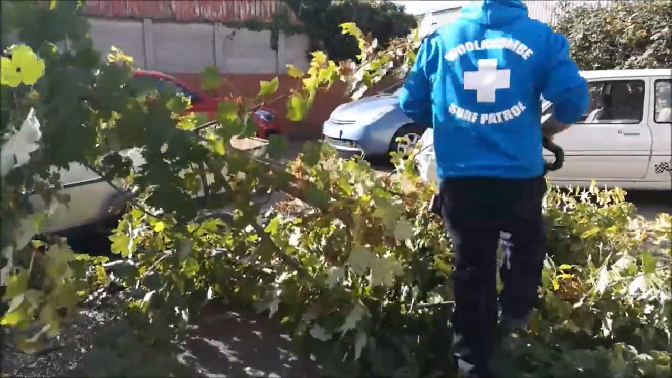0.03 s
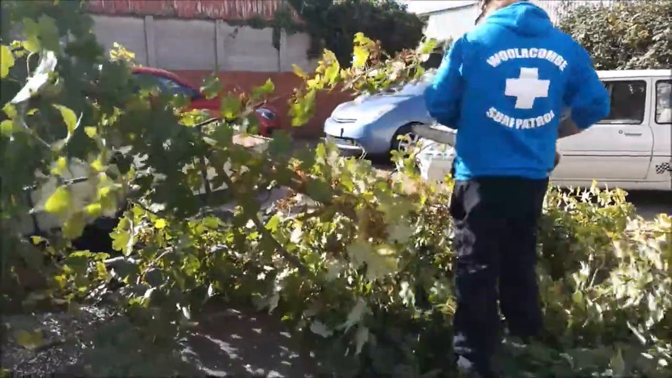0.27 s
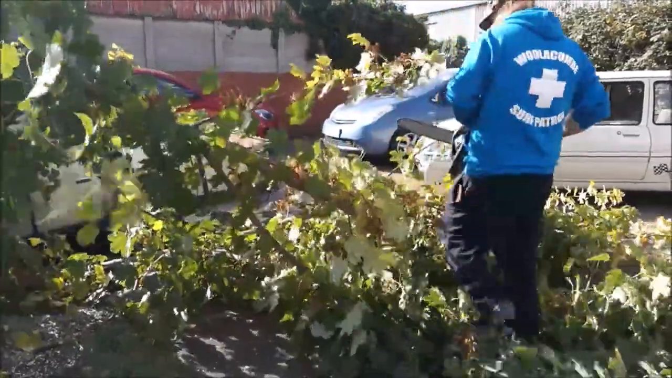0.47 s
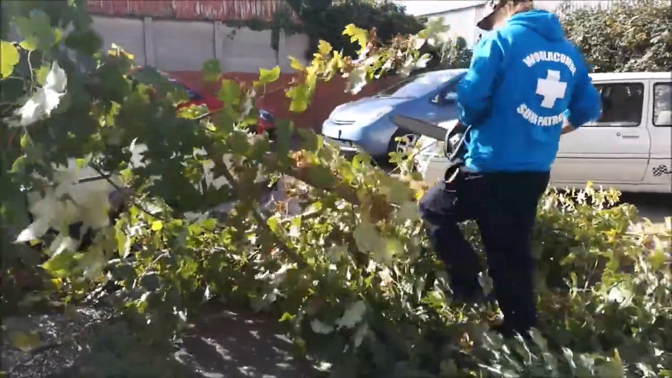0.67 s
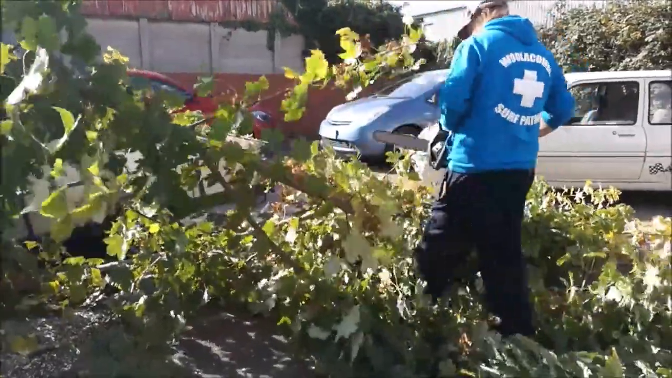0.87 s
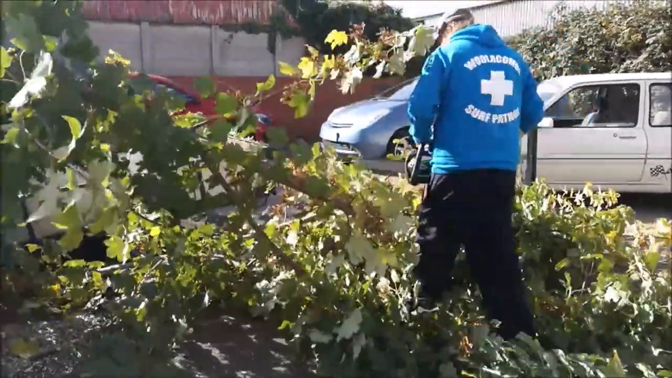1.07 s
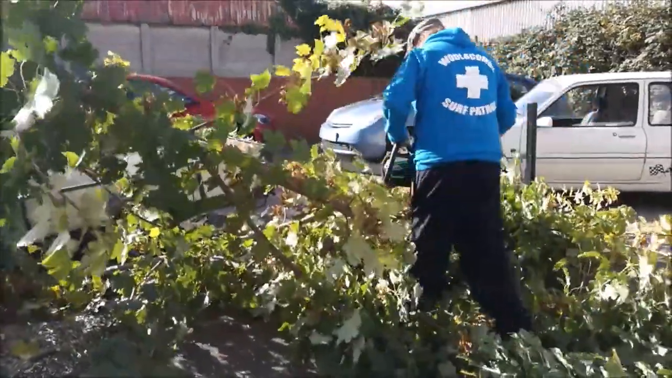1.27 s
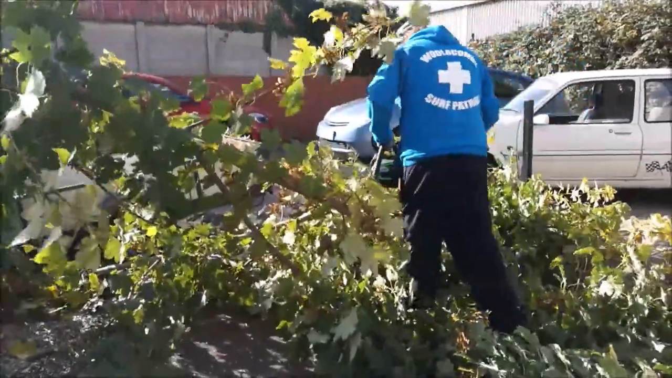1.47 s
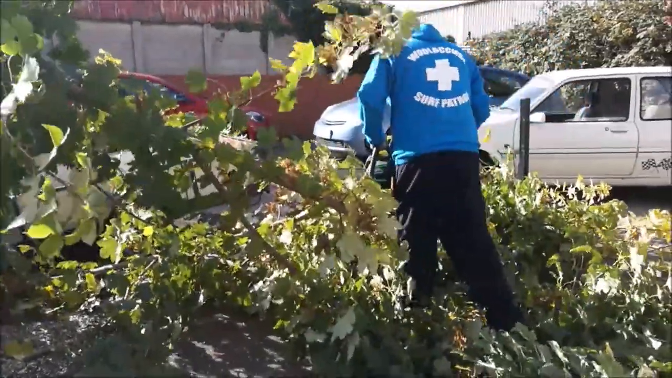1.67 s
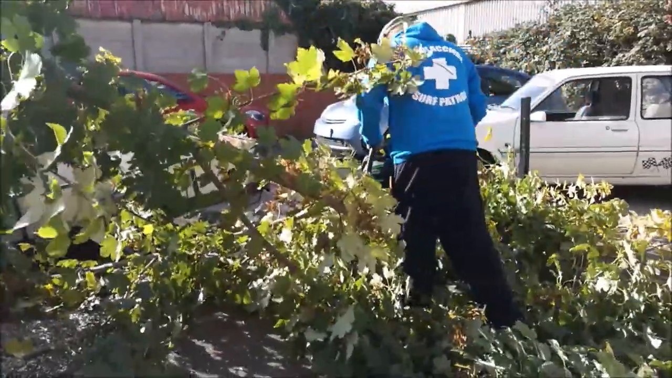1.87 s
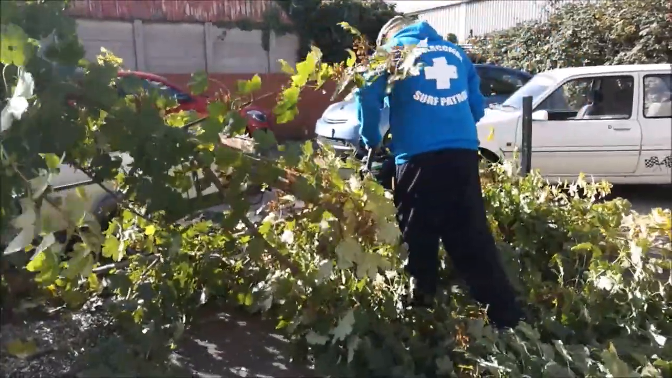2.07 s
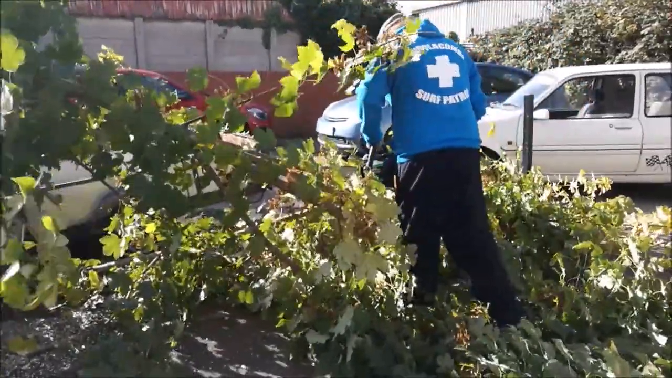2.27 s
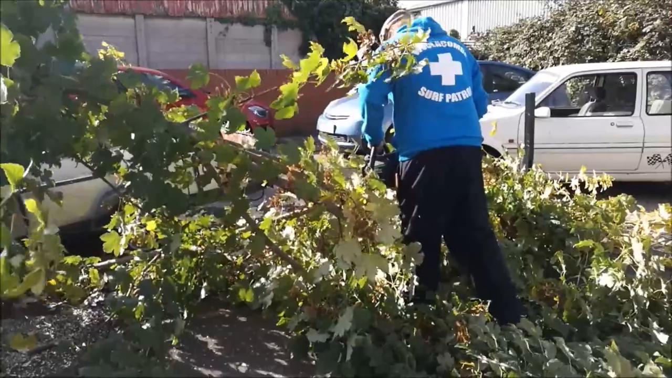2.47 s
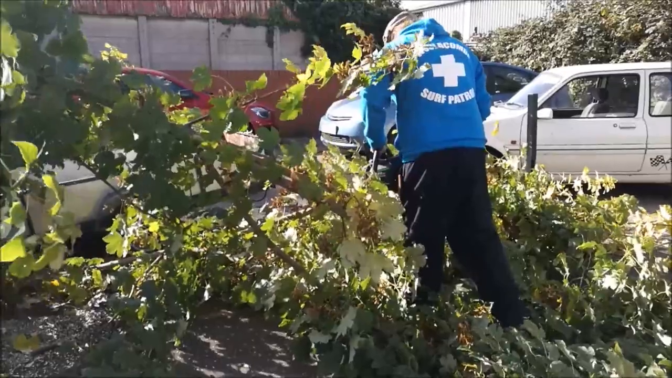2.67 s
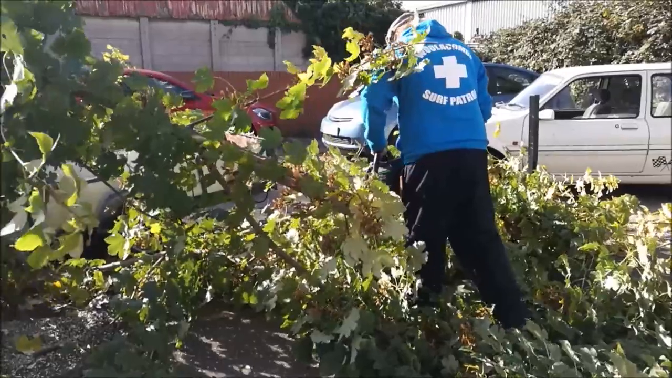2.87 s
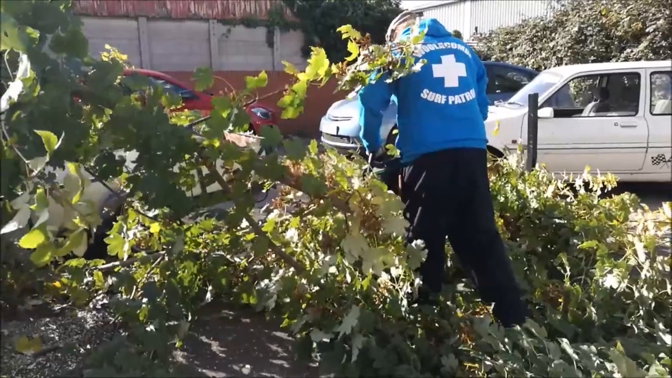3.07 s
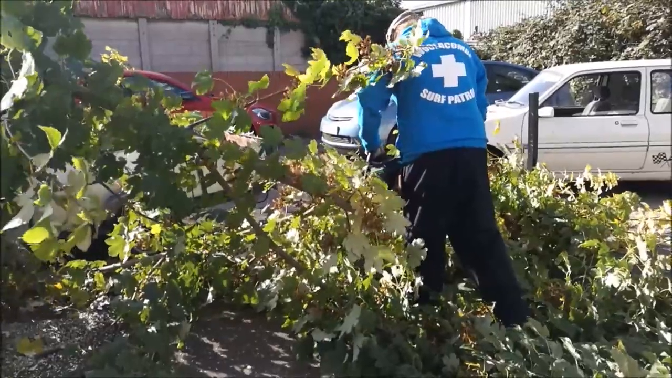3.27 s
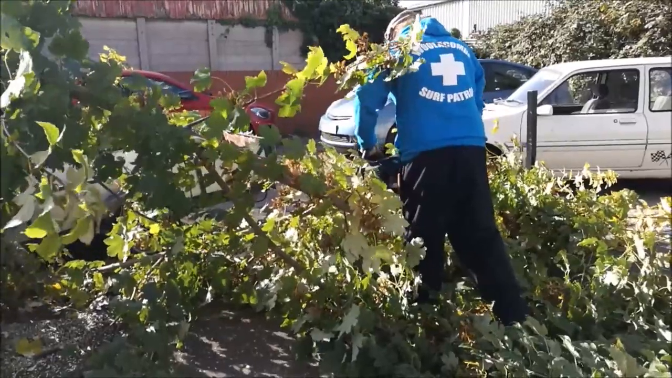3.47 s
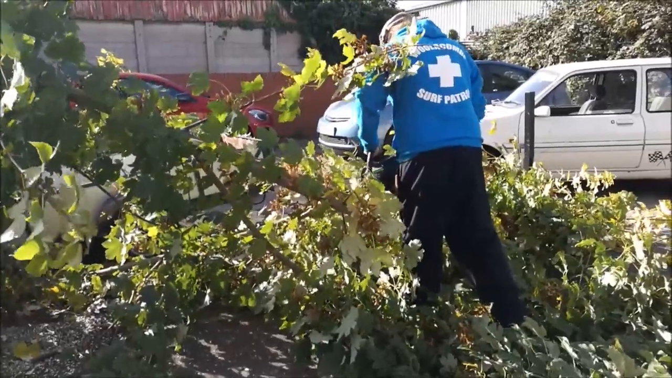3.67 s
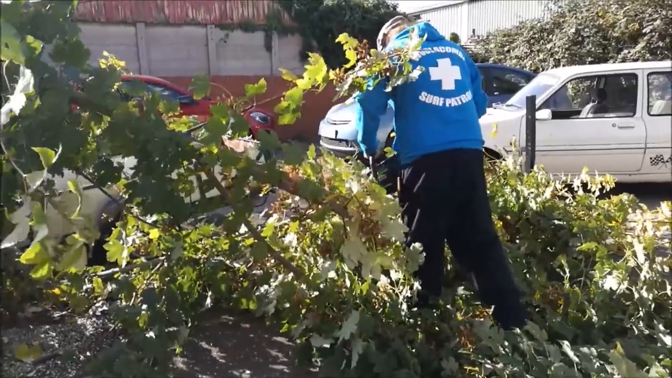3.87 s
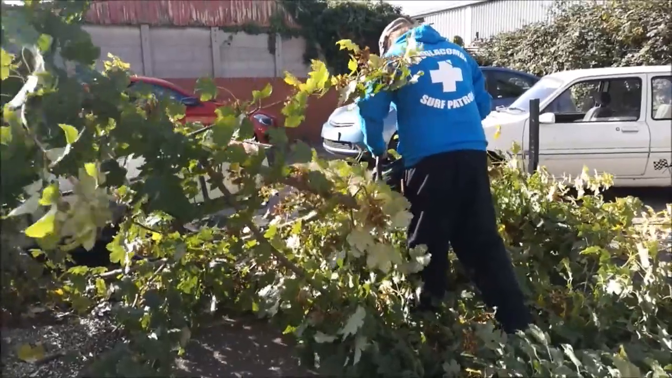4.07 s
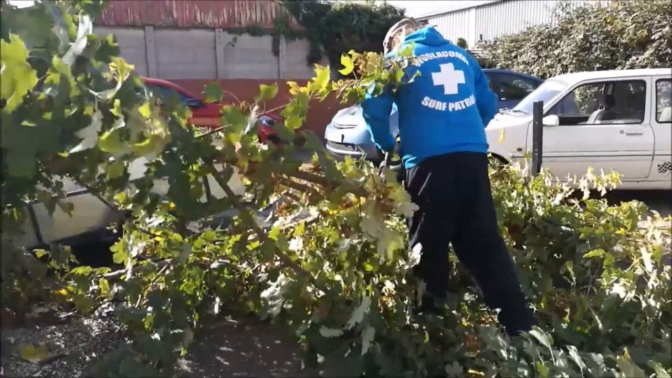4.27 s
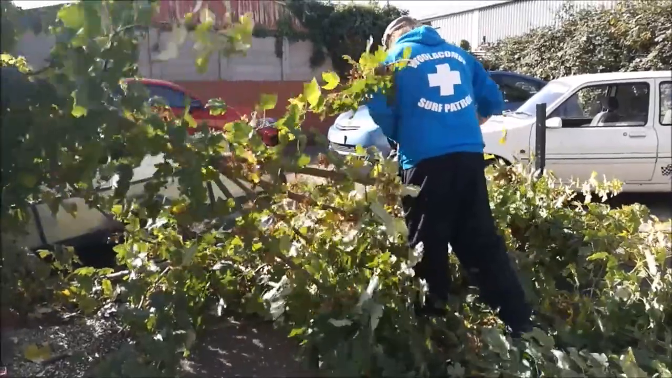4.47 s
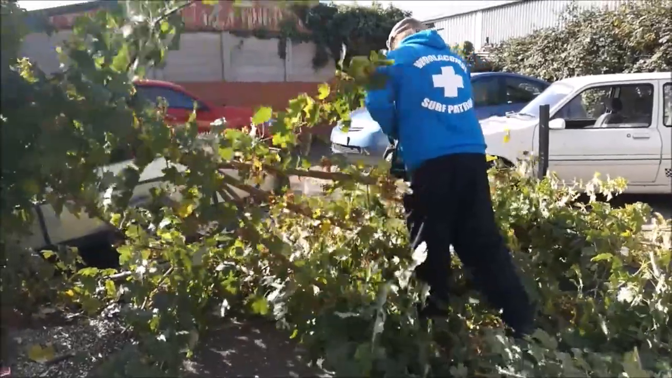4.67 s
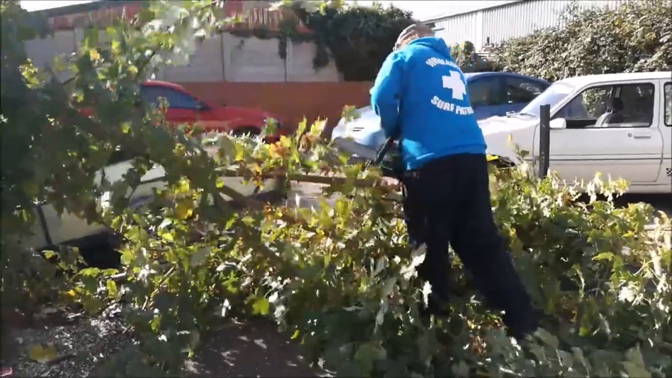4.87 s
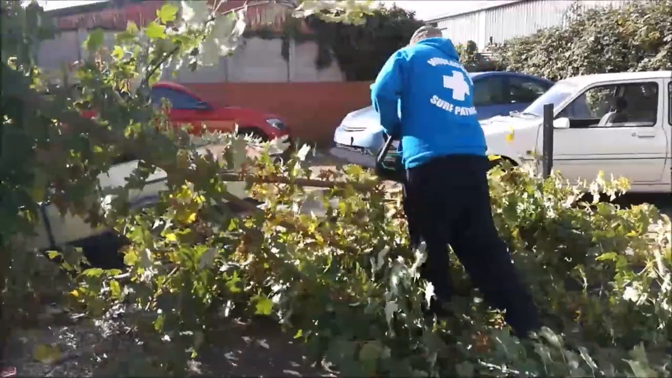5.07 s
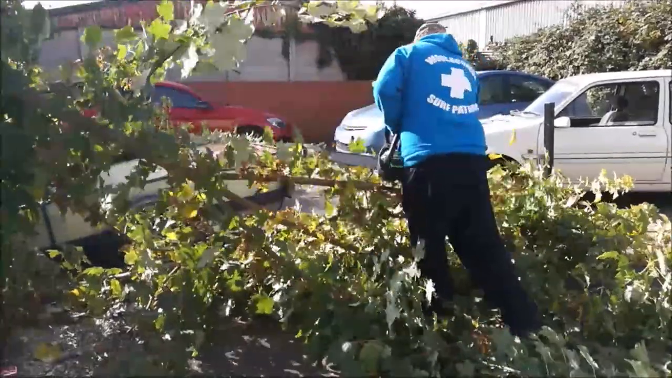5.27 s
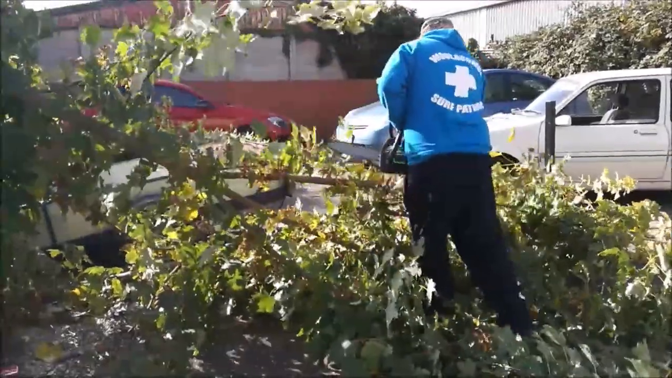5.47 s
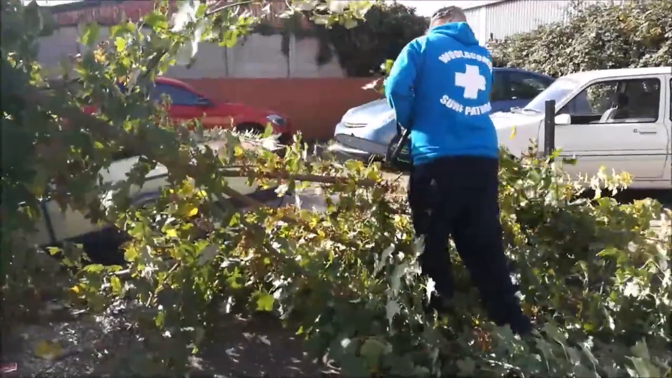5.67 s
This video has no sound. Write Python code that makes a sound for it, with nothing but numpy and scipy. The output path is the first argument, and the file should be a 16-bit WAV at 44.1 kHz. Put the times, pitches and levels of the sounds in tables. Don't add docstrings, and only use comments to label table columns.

```python
import sys
import numpy as np
from scipy import signal
from scipy.fft import rfft, irfft
from scipy.io import wavfile

SR = 44100
rng = np.random.default_rng(int(sys.argv[2]) if len(sys.argv) > 2 else 0)


def persist_wave(psi):
    counts = np.round(np.clip(psi, -1, 1) * 32767).astype(np.int16)
    wavfile.write(sys.argv[1], SR, np.atleast_2d(counts).T)


def linear_from_db(decibels):
    return 10 ** (np.asarray(decibels, float) / 20)


N = 253134
T = np.arange(N) / SR
BINS = np.fft.rfftfreq(N, 1 / SR)
TRIGGER_S, BRAKE_S = 1.315, 3.968

# (time [s], chain level at full speed [dB], bite [0-1])
EFFORT = [
    (1.4, -28.5, 0),
    (1.7, -26, 0),
    (2.28, -28.5, 0.23),
    (2.55, -30, 0.42),
    (2.9, -30, 0.63),
    (3.44, -24.5, 0.96),
    (3.57, -30, 0.41),
    (3.82, -32, 0.35),
    (3.94, -30.5, 0.24),
]
# (level [dB], change at full bite [dB], change per tenfold speed [dB])
OVERTONES = [(-35.6, -2, 45), (-39.2, 2, 28), (-42.5, 9.5, 66), (-46, 7.5, 60)]
# (frequency [Hz], gain [dB])
CASE_RADIATION = [(400, -22), (500, -10), (590, 0), (700, 4), (800, -8), (1200, 0), (1450, -8), (1680, 1.5)]


def chainsaw():
    driven, speed, snag_db = rotation()
    since, braked = np.maximum(T - TRIGGER_S, 0), np.maximum(T - BRAKE_S, 0)
    s, level_db, bite = np.transpose(EFFORT)
    bite = np.interp(T, s, bite)
    slow = np.log10(driven / 100)

    overtones_db = []
    for k, (db, bite_db, speed_db) in enumerate(OVERTONES, 1):
        load_db = bite_db * bite + speed_db * slow
        case_db = read(CASE_RADIATION, 6 * k * speed)
        overtones_db.append(db + load_db + case_db - 520 * braked - 99 * (since == 0))

    unsteady = 0.00299 + 0.00015 * np.maximum(95 - speed, 0)
    speed = speed * (1 + unsteady * wander(60, count=1)[0])
    chain_db = np.interp(T, s, level_db) + 39 * slow
    onset = np.minimum(since / .012, 1)
    noise = onset * linear_from_db(chain_db) * chain(speed, bite, snag_db, braked)
    return ports(noise) + sprocket(speed, overtones_db)


# (time [s], speed [turns/s])
FULL_SPEED = [
    (2.6, 100.6),
    (3.03, 99.8),
    (3.23, 99.1),
    (3.43, 95.3),
    (3.48, 95.3),
    (3.62, 101.6),
    (3.73, 99.0),
    (3.82, 101.8),
    (3.95, 100),
]
# (time [s], length [s], housing roar [dB])
SNAGS = [
    (1.85, .1, 2.5),
    (2.01, .08, 4),
    (2.4, .12, 2),
    (2.84, .06, .8),
]


def rotation():
    start, knee = 18.8, 20
    since, braked = np.maximum(T - TRIGGER_S, 0), np.maximum(T - BRAKE_S, 0)
    ramp = start + 52 * since + 18.5 * since ** 2
    full = np.interp(T, *np.transpose(FULL_SPEED))
    driven = (ramp ** -knee + full ** -knee) ** (-1 / knee)
    snag_db = sum(db * np.sin(np.pi * np.clip((T - s) / length, 0, 1)) for s, length, db in SNAGS)
    speed = driven - .9 * snag_db - 750 * braked
    return driven, np.maximum(speed, start), snag_db


# (two turns below [dB], one below [dB], centre [dB], one above [dB], two above [dB], three above [dB])
SIDEBANDS = [(-43, -28, .3, -16, -25, -25), (-20.5, -11.5, -.3, -11, -22, -24),
             (-22, -3.5, 1.6, -14, -17, -17), (-14, -11, -0.12, -10, -14, -12)]


def sprocket(speed, overtones_db):
    whine = np.zeros((2, N))
    for k, (db, side_db) in enumerate(zip(overtones_db, SIDEBANDS)):
        orders = list(zip(6 * (k + 1) + np.arange(-2, 4), side_db))
        strong = tones(speed, orders[1:3], waver_db=1.2 + 0.45 * k, waver_hz=21.97)
        weak_orders = orders[:1] + orders[3:]
        weak = [tones(speed, weak_orders, waver_db=4.0, waver_hz=22.01) for path in range(2)]
        whine += linear_from_db(db) * (strong * np.array([[1], [.35]]) + np.array(weak))
    guide_bar = peak(hz=1690, width=24, db=4.8)
    return ports(coloured(whine, guide_bar))


# (frequency [Hz], width [Hz], gain [dB])
HOUSING = [(700, 130, 3), (1200, 170, 3), (1670, 170, 4), (2350, 200, 2), (2860, 200, 3)]
# (frequency [Hz], density [dB per Hz])
HISS = [(1500, -26.5), (2500, -7), (4000, -4), (4800, -6.5), (8000, -7.5), (10700, -2.5), (12900, -11),
        (14500, -12.5), (15900, -15)]
ROAR = [(180, -53), (300, -27), (434, -51), (528, -29), (585, -7.5), (642, -18), (968, -11), (1200, -0.5),
        (1460, -6), (1740, 0.5), (2120, -3), (3500, -10.5), (4550, -15), (7700, -120)]
GROWL = [(150, -13), (250, -3.5), (400, -14), (700, 4), (950, 1.5), (1200, 1), (2000, -56)]


def chain(speed, bite, snag_db, braked):
    hiss_db = -330 * braked
    roar_db = 2 - 9 * bite + snag_db - 230 * braked
    growl_db = -8.5 - 16.5 * bite + snag_db - 310 * braked

    turns = np.cumsum(speed) / SR
    tooth = np.exp(-(6 * turns % 1) / .25)
    once_a_turn = 1 + 0.077 * np.cos(2 * np.pi * turns)
    flare = (2.0 + tooth) * once_a_turn * linear_from_db(0.45 * wander(30.17, count=1)[0])
    housing = np.prod([peak(*mode) for mode in HOUSING], axis=0)
    hiss = evened(coloured(flare * grit(3000, 1.7, 0.43), linear_from_db(read(HISS, BINS))))
    roar = evened(coloured(flare * grit(900, 3.1, 0.21), linear_from_db(read(ROAR, BINS)) * housing))
    growl = evened(coloured(flare * grit(300, 2.9, 0.37), linear_from_db(read(GROWL, BINS))))
    return linear_from_db(hiss_db) * hiss + linear_from_db(roar_db - 3.5) * roar + linear_from_db(growl_db) * growl


# (time [s], length [s], pitch [Hz], first level [dB], last level [dB])
RING = [
    (1.33, 1.0, 2825, -60, -47),
    (4.0, .14, 2800, -57, -61),
    (4.2, .36, 2770, -62, -61),
]
# (time [s], length [s], pitch [Hz], level [dB])
SQUEAKS = [(2.53, .18, 5480, -39), (3.28, .2, 3430, -37), (3.28, .24, 3990, -39), (3.22, .12, 9630, -41),
           (3.42, .1, 1990, -41), (3.86, .1, 2330, -36), (3.9, .05, 6300, -39), (1.86, .08, 1700, -42),
           (2.02, .07, 1200, -42), (2.02, .07, 1610, -43), (1.43, .08, 1650, -55), (3.28, .08, 2340, -39),
           (3.6, .3, 708, -46), (4.09, .06, 1800, -65)]


def squeaks():
    level, pitch = np.zeros(N), np.full(N, float(RING[0][2]))
    for s, length, hz, first_db, last_db in RING:
        change_db = (last_db - first_db) * np.clip((T - s) / length, 0, 1)
        edges = np.clip(np.minimum(T - s, s + length - T) / .06, 0, 1)
        level += linear_from_db(first_db + change_db) * edges
        pitch = np.where(T > s, hz + 5 * change_db, pitch)
    rub = rng.standard_normal((2, N))
    waver = linear_from_db(1.7 * wander(30, count=1))
    out = level * waver * evened(resonate(rub, pitch + 25 * wander(13, count=1)[0], width=55))
    for s, length, hz, db in SQUEAKS:
        at = slice(round(s * SR), round((s + length) * SR))
        count = at.stop - at.start
        tone = evened(resonate(rub[:, at], np.full(count, hz), width=14))
        out[:, at] += linear_from_db(db) * tone * np.sqrt(np.hanning(count))
    return ports(out) * linear_from_db([[-2.5], [1.5]])


# (frequency [Hz], density [dB per Hz])
RUSTLE = [(530, -74), (900, -7.5), (1370, -0.5), (1600, -7), (1950, 1.5), (2170, -4.5), (2420, 0.5),
          (3110, -1), (7580, -6.5), (10200, 3), (13200, -5.5), (15100, -12), (16000, -15)]


def leaves():
    bright, deep = stirring()
    low_share = 1 / (1 + (BINS / 4700) ** 6)
    spectrum = linear_from_db(read(RUSTLE, BINS))
    crackle = grit(1500, 2.5, 0.23) * linear_from_db(1.03 * wander(90, count=1))
    fizz = evened(coloured(crackle, spectrum * np.sqrt(1 - low_share)))
    crunch = evened(coloured(crackle, spectrum * np.sqrt(low_share)))
    return ports(bright * fizz + deep * crunch)


# (time [s], length [s], level
# [dB], deeper crunch against it [dB])
STIRS = [(0.057, 0.4, -44.5, -3.5), (0.284, 0.25, -48.5, -2.5), (0.673, 0.022, -53.5, -9.5),
         (0.711, .05, -54, 0.5), (0.737, 0.17, -56, -2), (0.812, 0.025, -54.5, 0), (.945, 0.057, -52, -9),
         (1.035, 0.025, -54, -14), (1.061, 0.054, -49.5, -8), (1.107, 0.084, -51, -4.5),
         (1.747, 0.053, -37, -2), (3.994, 0.24, -62, 9.5), (4.187, 0.071, -57, -.6),
         (4.23, 0.31, -56, -3.5), (4.392, 0.1, -50, -3.5), (4.468, 0.65, -51.5, -4.5),
         (4.695, .04, -57, 1.5), (4.823, 0.059, -52.5, -5), (4.874, 0.066, -53.5, -5),
         (4.957, 0.15, -52.5, -7), (5.057, 0.36, -58, -8), (5.205, 0.077, -52.5, -2),
         (5.31, 0.053, -60, -4), (5.402, 0.27, -51, -7.5), (5.61, 0.18, -50, -2.5)]


def stirring():
    bright = np.full(N, linear_from_db(2 * -63.5))
    deep = bright * linear_from_db(2 * -10)
    for s, length, db, deep_db in STIRS:
        u = np.clip((T - s) / length, 0, 4)
        rise = np.minimum(u / 0.22, 1)
        power = (rise * linear_from_db(db - 11 * u ** 2)) ** 2
        bright = bright + power
        deep = deep + power * linear_from_db(2 * deep_db)
    return np.sqrt(bright), np.sqrt(deep)


# (time [s], peak [dB], pitch [Hz])
SNAPS = [(0.598, -39, 9600), (0.6783, -37.5, 10700), (0.7156, -38, 10500), (0.7987, -30, 11460),
         (0.87, -43, 11380), (0.959, -39, 9700), (1.037, -41, 9910), (1.07, -31, 11100),
         (1.1462, -31.5, 11200), (1.3216, -37, 3275), (1.3566, -32, 2780), (1.664, -21, 10500),
         (1.7498, -11.5, 6800), (4.4117, -34, 3020), (4.6994, -37, 3570), (4.8912, -34, 11200),
         (5.2287, -36, 10400), (5.6336, -31, 2540)]


def twigs():
    out, t = np.zeros((2, N)), np.arange(2000) / SR
    spray = rng.standard_normal((len(SNAPS), 2, len(t)))
    attack = np.minimum(t / 0.00093, 1)
    for (s, db, hz), noise in zip(SNAPS, spray):
        ring = np.sin(2 * np.pi * hz * t) * np.exp(-t / 0.0027)
        puff = noise * (0.22 * np.exp(-t / 0.0018) + 0.18 * np.exp(-t / 0.0063))
        first = round(s * SR)
        out[:, first:first + len(t)] += linear_from_db(db - 3.5) * (0.38 * ring + puff) * attack
    return ports(coloured(out, linear_from_db(0.19 * read(RUSTLE, BINS) + 4.5)))


# (time [s], peak [dB], pitch [Hz])
STEPS = [
    (.085, -41.5, 283),
    (1.62, -51, 258),
]


def boots():
    out, t = np.zeros(N), np.arange(4000) / SR
    envelope = np.exp(-t / 0.019) * np.minimum(t / 0.014, 1)
    for (s, db, hz), noise in zip(STEPS, rng.standard_normal((len(STEPS), len(t)))):
        thud = evened(resonate(noise, np.full(len(t), hz), width=36))
        first = round(s * SR)
        out[first:first + len(t)] += linear_from_db(db) * thud * envelope
    return out


# (multiple of the base rate [1], level [dB])
CAR_ORDERS = [(.5, -2), (1, 0), (2, 0), (3, -10), (4, -13)]
HUM_ORDERS = [(1, -66), (2, -50.5), (3, -58.5), (4, -68.5), (5, -76.5), (6, -71), (7, -74), (8, -81),
              (9, -65), (10, -80), (11, -72.5)]


def engines():
    firing_hz = 67 + 10.5 * np.tanh((T - 2.7) / 1.9)
    car = tones(firing_hz, CAR_ORDERS, waver_db=2.1, waver_hz=4.4)
    car_db = -59 - 21 * np.exp(-T / 0.67) + bump(3.0, spread=0.33, db=-4.5)

    hum_hz = 78.5 - 0.93 * (1 + np.tanh((T - 2.5) / .8)) / 2
    hum = tones(hum_hz, HUM_ORDERS, waver_db=0.8, waver_hz=5.6)
    hum_db = -0.2 + bump(3.42, spread=0.66, db=-4.5)
    return linear_from_db(car_db) * car + linear_from_db(hum_db) * hum


# (frequency [Hz], density [dB per Hz])
YARD_WASH = [(12, -42), (20, -30), (49, -1.5), (101, -13), (154, -3), (422, -16), (590, -17.5),
             (698, -11.5), (1150, -25.5), (2670, -22), (7520, -30), (10800, -40), (16000, -36)]


def yard():
    a, b = rfft(rng.standard_normal((2, N)))
    same = 1 / (1 + (BINS / 330) ** 2)
    pair = np.array([a, same * a + np.sqrt(1 - same ** 2) * b])
    wash = irfft(pair * linear_from_db(read(YARD_WASH, BINS)), N)
    lull_db = bump(1.36, spread=0.22, db=-4.5)
    swell_db = 4.2 * (1 + np.tanh((T - 5.26) / .3)) / 2
    rise = np.clip(0.23 + T / 0.16, 0, 1)
    return linear_from_db(-52.5 + lull_db + swell_db) * rise * evened(wash)


# (frequency [Hz], left over right [dB])
PORT_DB = [(60, -6), (92, 9), (140, -4), (210, -1), (330, -3), (500, 6), (770, 11.5), (1170, -1.5),
           (1790, -6.5), (2740, 4), (4190, 5), (6410, 9), (9810, 20.5), (15000, 0)]
# (frequency [Hz], lead of the left [rad])
PORT_LEAD = [(0, 0), (520, 1.56), (1380, 1.3), (1640, 0.62), (2070, 3.5), (2330, 5.5), (2930, 1.5),
             (3270, -1), (3700, 11.5), (4650, 15.5), (5770, 17.5), (9650, 30), (13700, 35), (16000, 17)]
# (frequency [Hz], likeness [0-1])
PORT_SAME = [(60, 1), (300, 1), (700, 1), (1500, 0.6), (3000, 0.11), (6000, 0.069), (15000, 0.26)]


def ports(pair):
    direct, scattered = rfft(pair)
    same = np.clip(read(PORT_SAME, BINS), 0, 1)
    delay = np.exp(-1j * read(PORT_LEAD, BINS))
    right = (same * direct + np.sqrt(1 - same ** 2) * scattered) * delay
    ratio = linear_from_db(read(PORT_DB, BINS))
    right_gain = 1 / np.sqrt(1 + ratio ** 2)
    left_gain = ratio * right_gain
    return irfft(np.array([direct * left_gain, right * right_gain]), N) * 2


def tones(hz, orders, waver_db, waver_hz):
    turns = np.cumsum(hz) / SR
    waver, start = wander(waver_hz, count=len(orders)), rng.random(len(orders))
    total = np.zeros(N)
    for (k, db), w, phase in zip(orders, waver, start):
        total += linear_from_db(db + waver_db * w) * np.sin(2 * np.pi * (k * turns + phase))
    return np.sqrt(2) * total


def grit(per_s, spread_db, share):
    size = linear_from_db(spread_db * np.minimum(rng.exponential(1, (2, N)), 3))
    clicks = (rng.random((2, N)) < per_s / SR) * size * rng.choice([-1., 1.], (2, N))
    share = np.clip(share, 0, 1)
    return np.sqrt(share) * evened(clicks) + np.sqrt(1 - share) * rng.standard_normal((2, N))


def resonate(x, hz, width):
    turn, r = np.exp(2j * np.pi * np.cumsum(hz) / SR), np.exp(-np.pi * width / SR)
    return (turn * signal.lfilter([1 - r], [1, -r], x / turn)).real


def peak(hz, width, db):
    return 1 + (linear_from_db(db) - 1) / (1 + ((BINS - hz) * 2 / width) ** 2)


def coloured(x, gain):
    return irfft(rfft(x) * gain, N)


def read(points, hz):
    f, value = np.transpose(points)
    return np.interp(np.log(hz + 1), np.log(f + 1), value)


def wander(rate_hz, count):
    steps = int(N / SR * rate_hz) + 3
    knots = rng.standard_normal((steps, count)).T
    curves = np.array([np.interp(T * rate_hz, np.arange(steps), k) for k in knots])
    return curves * np.sqrt(1.5)


def bump(s, spread, db):
    return db * np.exp(-((T - s) / spread) ** 2)


def evened(x):
    return x / np.sqrt(np.mean(x ** 2) + 1e-20)


def scene():
    return chainsaw() + squeaks() + leaves() + twigs() + boots() + engines() + yard()


def band_limit(x):
    return signal.sosfilt(signal.butter(12, 16450, fs=SR, output="sos"), x)


def record(dry):
    mix = coloured(dry, BINS < 15850)
    return band_limit(mix)


dry = scene()
out = record(dry)
persist_wave(out)
```